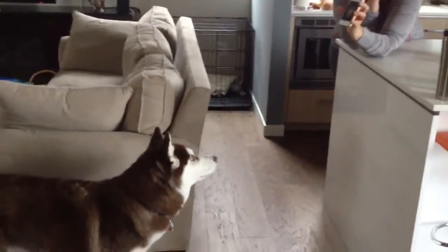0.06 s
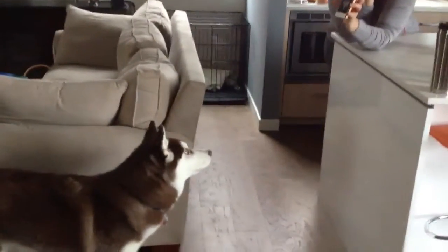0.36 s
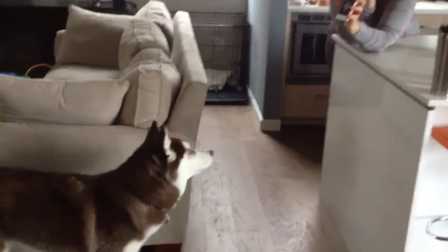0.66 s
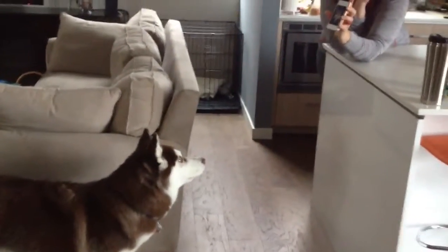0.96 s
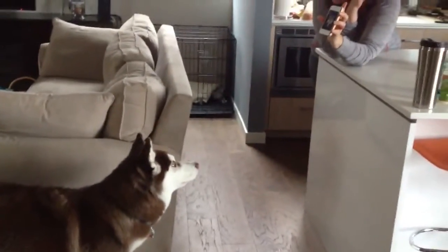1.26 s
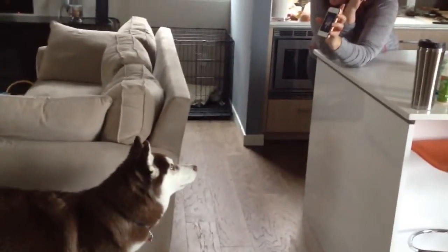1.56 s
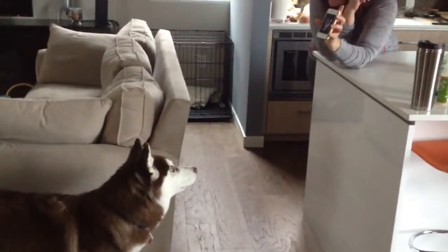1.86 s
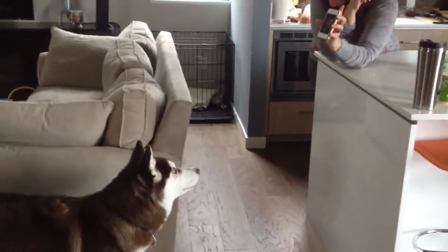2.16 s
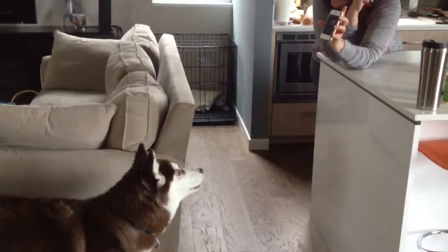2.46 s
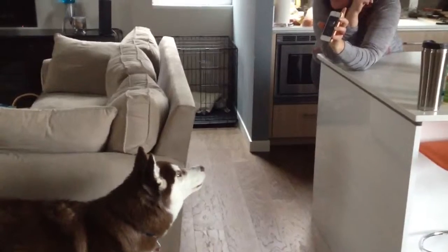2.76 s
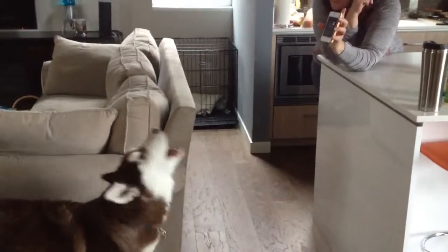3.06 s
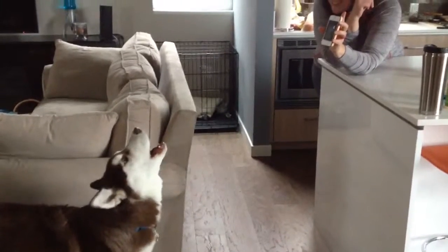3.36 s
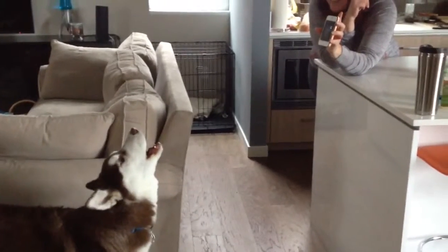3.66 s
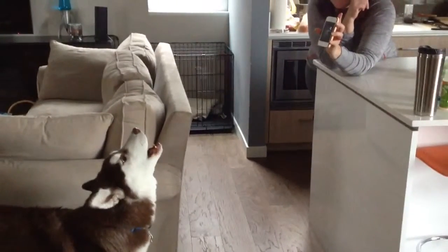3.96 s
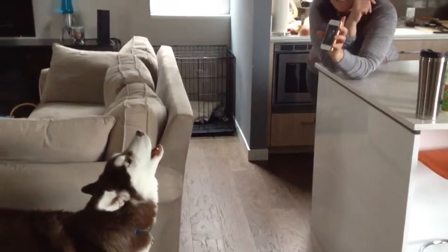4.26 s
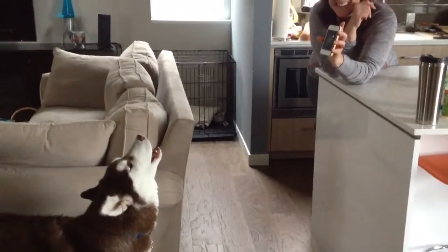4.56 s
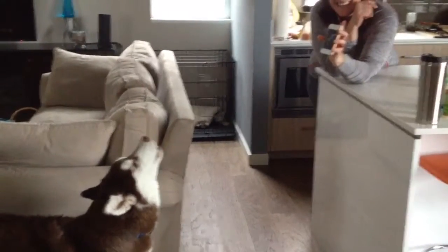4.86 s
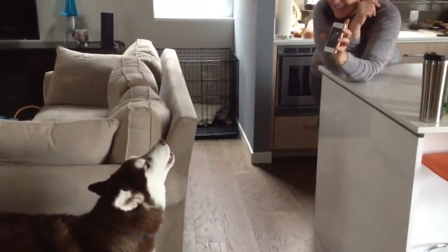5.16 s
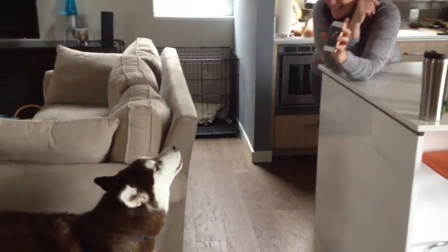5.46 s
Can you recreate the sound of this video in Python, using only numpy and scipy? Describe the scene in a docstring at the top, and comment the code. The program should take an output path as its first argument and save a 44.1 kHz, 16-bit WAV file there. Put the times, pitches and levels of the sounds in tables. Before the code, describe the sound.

A dog yaps faintly from a phone speaker, then a husky answers with a hoarse bark and one long, loud howl indoors.

```python
"""A husky answers a phone

In a hard-floored living room, a dog yaps and yowls faintly from a phone's small speaker.
A husky answers with a hoarse bark that opens into one long clean howl, breaks to a lower note,
swells and sags. Its vocal folds make a tone and puffs of air, which throat and mouth shape.
The room rings with both dogs; an appliance hums quietly."""
import sys
import numpy as np
from scipy import signal
from scipy.fft import rfft, irfft, next_fast_len
from scipy.io import wavfile
from scipy.ndimage import uniform_filter1d, minimum_filter1d, map_coordinates

SR = 44100
rng = np.random.default_rng(int(sys.argv[2]) if len(sys.argv) > 2 else 0)


def wav_out(sig):
    """Save sig, one row per channel (or a flat mono array), as 16-bit PCM at SR to the path in sys.argv[1]."""
    wavfile.write(sys.argv[1], SR, np.round(np.clip(np.atleast_2d(sig).T, -1, 1) * 32767).astype(np.int16))


N = 247386
START_S, OPEN_S = 2.872, 0.079  # the howl sets in; time its overtones take to arrive
CRACK_S = 3.905  # the voice breaks to the lower note

# the tune of the howl: (time [s], pitch [Hz])
HOWL_TUNE = [(2.93, 383.7), (2.985, 530.3), (3.08, 504.7), (3.15, 499.5), (3.38, 496.8), (3.5, 490.4),
             (3.85, 481), (3.905, 471), (3.925, 431.8), (4.06, 398.6), (4.2, 378.5), (4.44, 362),
             (5.06, 363.8), (5.16, 375), (5.36, 381), (5.5, 376.3), (5.56, 360.4), (5.61, 329)]
# how hard the husky pushes: (time [s], level [dB])
HOWL_EFFORT = [(2.87, -64), (2.9, -26.5), (2.95, -22), (2.985, -15.5), (3.17, -10), (3.42, -14),
               (3.6, -18.5), (3.73, -21.5), (3.87, -16), (4.13, -20.5), (4.36, -28.5), (4.62, -26.5),
               (5.2, -26), (5.36, -29.5), (5.52, -30), (5.61, -42.5)]
# how hoarse it is: (time [s], hoarseness [dB])
HOARSENESS = [(2.96, 2.5), (3.0, -4), (3.16, -24.5), (3.7, -19.5), (3.89, -16), (3.93, -8.5), (4.05, -18),
              (4.6, -15.5), (4.9, -19), (5.1, -25), (5.47, -26.5), (5.61, -8)]
def husky():
    """Vibrating vocal folds: a rough bark settles into a clean howl."""
    melody, effort_db, hoarse_db = curves(HOWL_TUNE) + curves(HOWL_EFFORT) + curves(HOARSENESS)
    drive = (np.arange(N) / SR > START_S) * echo_beating()
    # hoarse folds also keep their pitch less well
    pitch = melody * (1 + 0.0014 * wobble(34) + 0.0207 * amp(hoarse_db) * wobble(170))
    phase = cycle(pitch)
    *low_swells, nasal_swell = room_swells()
    tone, tone_level = chest(melody, phase, effort_db, low_swells)
    breath = rasp(phase, tone_level, hoarse_db)
    low = in_room(drive * tone, wet_db=-15)
    rough = in_room(drive * (bark(melody, phase) + breath), wet_db=-16)
    # the upper overtones get more room echo; the low harmonics stay drier and steadier
    high = in_room(drive * upper_voice(pitch, phase, hoarse_db, nasal_swell), wet_db=0)
    return low + rough + high


# how the throat boosts the third harmonic: (frequency [Hz], level [dB])
THROAT_COLOUR = [(1000, -10), (1085, -1), (1128, 5), (1200, 2.5), (1300, -4), (1465, -3.5), (1497, -2.5),
                 (1575, 11.5)]
# second and third harmonic: (level [dB], rise with effort [dB/dB], rise as the mouth opens [dB])
SECOND_HARMONIC = (-26.5, 0.035, 17.4)
THIRD_HARMONIC = (-33, 0.54, 2)
def chest(melody, phase, effort_db, swells):
    """The howl's core and its level: three harmonics, pure tones at 1, 2 and 3 times the pitch."""
    first, second, third = swells
    levels = [first * amp(effort_db),
              second * strength(SECOND_HARMONIC),
              third * strength(THIRD_HARMONIC) * band(THROAT_COLOUR, 3 * melody)]
    tone = sum(level * np.sin(k * phase + rng.uniform(0, 2 * np.pi)) for k, level in enumerate(levels, 1))
    return np.sqrt(2) * tone, np.linalg.norm(levels, axis=0)


# rough breath in the throat: (frequency [Hz], level [dB])
RASP_COLOUR = [(120, -33.5), (300, -22.5), (520, 4.5), (680, -4.5), (815, 2), (930, -3), (1250, -21),
               (1600, -3.5), (2000, -19), (2800, -31.5)]
def rasp(phase, tone_level, hoarse_db):
    """Air puffs through the folds, louder when the voice is strong or hoarse."""
    return tone_level * amp(hoarse_db - 7 + 2.4 * wobble(22.29)) * noise(RASP_COLOUR, puffs(phase))


# a grunt, then the throaty bark: (start [s], rise time [s], level [dB])
BARK_BURSTS = [(2.879, 0.024, -18.5), (2.914, 0.029, -7.5)]
# the noise of slapping folds: (frequency [Hz], level [dB])
SLAP_COLOUR = [(59, -83), (100, -44), (279, -16.5), (365, -11), (627, -5), (723, 4.5), (787, -4),
               (858, -13), (1160, -17), (1300, -34), (1520, -36), (2290, -24), (3000, -63), (3900, -76),
               (6600, -120)]
def bark(melody, phase):
    """The folds slap every other cycle; a second, unsteady vibration lingers until the voice breaks."""
    bursts = sum(amp(db) * envelope(start, rise, t60=0.15) for start, rise, db in BARK_BURSTS)
    slaps = bursts * noise(SLAP_COLOUR, puffs(phase / 2))
    rise_s, fade_s = 0.02, 0.4  # shape of the second vibration
    second_hz = np.maximum(738, 1.61 * melody) * (1 + 0.026 * wobble(200))
    second_gain = sum(amp(db - 8.5) * envelope(start, rise_s, fade_s) for start, _, db in BARK_BURSTS)
    second_gain += amp(-50.5) * envelope(START_S, rise_s, fade_s, hold=CRACK_S - START_S - rise_s)
    return slaps + np.sqrt(2) * second_gain * np.sin(cycle(second_hz))


# the husky's jaw: (time [s], opening [0 shut to 1 wide])
JAW = [(2.96, 1), (3.03, 0.22), (3.14, 0.05), (3.38, 0.6), (3.58, 0.72), (3.9, 0.8), (4.03, 0.38),
       (4.23, 0.81), (4.42, 0.67), (4.58, 0.41), (4.73, 0.42), (4.92, 0.22), (5.2, 0.52), (5.38, 0.65),
       (5.61, 0.38)]
# ringing of the throat, of the open mouth and of the highest overtones: (frequency [Hz], level [dB])
RING_COLOUR = [(1450, 9), (1620, 8.5), (1810, 3), (2000, 3.5), (2170, 1), (2280, 3.5), (2480, -0.5),
               (2640, 0.5), (2750, -14.5), (2950, -28.5), (3280, -3), (3500, -11), (3750, -24),
               (4100, -31.5), (4800, -38.5), (5400, -45)]
SIZZLE_COLOUR = [(3900, -18), (4500, -17), (5100, -16.5), (5450, -6.5), (5680, 3), (6100, -1), (6550, 10.5),
                 (7200, 0.5), (7900, 4.5), (8400, -23)]
SHEEN_COLOUR = [(8300, -10), (9100, -5.5), (9900, -11.5), (10900, 0.5), (11400, -16), (12300, -14.5),
                (13000, -10.5), (13900, -13), (14300, -24.5), (15200, -15)]
# the same three parts: (level [dB], rise with effort [dB/dB], rise as the mouth opens [dB])
RING_PART = (-35, 0.12, 5)
SIZZLE_PART = (-52.5, 0.51, 19.5)
SHEEN_PART = (-55, 0.46, 0.95)
def upper_voice(pitch, phase, hoarse_db, nasal_swell):
    """High overtones pass through muzzle and lips: a nasal ring, an airy sizzle and a thin sheen."""
    mouth, = curves(JAW)
    lips = 1 + 0.22 * (mouth - .64)  # parted lips favour higher overtones in the sizzle
    ring = overtones(pitch, phase, RING_COLOUR, range(4, 13))
    ring = strength(RING_PART) * roughened(ring, phase, RING_COLOUR, hoarse_db - 2)
    sizzle = overtones(pitch / lips, phase, SIZZLE_COLOUR, range(11, 25))
    sizzle = strength(SIZZLE_PART) * roughened(sizzle, phase, SIZZLE_COLOUR, hoarse_db + 12.5)
    sheen = overtones(pitch, phase, SHEEN_COLOUR, range(16, 42))
    sheen = strength(SHEEN_PART) * roughened(sheen, phase, SHEEN_COLOUR, hoarse_db + 8.5)
    return nasal_swell * ring + sizzle + sheen


def strength(part):
    """One part of the husky's voice grows louder with effort and as the mouth opens."""
    level_db, per_effort, opening_db = part
    easy_db = -21  # the effort of an easy howl
    effort_db, mouth = curves(HOWL_EFFORT) + curves(JAW)
    fade_in, = curves([(START_S, 0), (START_S + OPEN_S, 1)])
    return fade_in * amp(level_db + per_effort * (effort_db - easy_db) + opening_db * (mouth - .5))


# brief swells and dips in the howl:
# (time [s], half width [s], harmonic 1 [dB], harmonic 2 [dB], harmonic 3 [dB], nasal ring [dB])
HOWL_SWELLS = [(2.99, 0.044, 1, -7, 1.5, -0.5), (3.259, 0.037, -2, -1, 4, -6.5),
               (3.34, 0.038, 1.5, -2.5, 5.5, 2.5), (3.55, .06, 0.5, 2, -2.5, -1.5),
               (3.65, 0.028, -19.5, 0, 10, -3.5), (3.76, 0.046, 0, -0.5, 0, -5),
               (3.829, .02, 1.5, -23, -4, -4), (4.004, 0.017, -8, -2, -2, 2),
               (4.128, 0.073, -0.5, 2, -0.5, 8.5), (4.226, 0.014, -1, 6.5, -6, -5.5),
               (4.339, 0.0098, -1, -8, -12, 4.5), (4.6, .25, -1, -.5, -0.5, 1.5),
               (5.18, 0.058, 0.5, 0.5, 6.5, 1), (5.38, .1, 1, 4, -0.5, 1), (5.5, 0.02, 3, 0.5, 1, -3)]
def room_swells():
    """Harmonics swell and dip briefly as the pitch glides through the room's resonances."""
    t = np.arange(0, N, 64) / SR
    db = sum(np.outer(np.exp(-((t - time) / width) ** 2), dbs) for time, width, *dbs in HOWL_SWELLS)
    return curves(np.column_stack([t, amp(db)]))


def echo_beating():
    """After the break, the higher note's echo beats against the lower note; the throbs slow and fade."""
    fast_hz, slow_hz, depth, fade_s = 42.56, 20.65, 0.63, 0.25
    since = np.maximum(np.arange(N) / SR - CRACK_S, 0)
    fading = np.exp(-since / fade_s)
    rate = (since > 0) * (slow_hz + (fast_hz - slow_hz) * fading)
    return 1 - depth * fading * np.sin(cycle(rate) / 2) ** 2


# body, brightness and whine of the dog on the phone: (frequency [Hz], level [dB])
PHONE_BODY = [(300, -22.5), (480, -26), (570, -5), (690, 3.5), (900, 2.5), (1100, -7), (1500, -44)]
PHONE_BRIGHT = [(700, -46), (950, -23.5), (1200, 9.5), (1420, -9.5), (1800, 3.5), (2150, -13.5),
                (2450, -6.5), (2900, -16.5), (3400, -21.5), (4200, -18), (6000, -31), (9000, -36)]
PHONE_WHINE = [(2100, -21), (2350, 2), (2480, -1), (2700, -13.5), (2900, -4.5), (3150, -27), (3500, -17),
               (3900, -45.5)]
def phone():
    """Short barks trail into yowls or whines, from a tiny speaker across the room."""
    pitch, rough_db, (body_gain, bright_gain, whine_gain) = yapping()
    # in high yowls the overtones sink into the breath noise
    hollow_db = np.interp(pitch, [620, 700], [0, 9])
    pitch = pitch * (1 + 0.0203 * amp(rough_db) * wobble(90))
    phase = cycle(pitch)
    body = overtones(pitch, phase, PHONE_BODY, range(1, 3))
    body = roughened(body, phase, PHONE_BODY, rough_db - 4)
    bright = overtones(pitch, phase, PHONE_BRIGHT, range(2, 5))
    bright = roughened(bright, phase, PHONE_BRIGHT, rough_db + hollow_db + 4.5)
    whine = overtones(pitch, phase, PHONE_WHINE, range(3, 8))
    return in_room(body_gain * body + bright_gain * bright + whine_gain * whine, wet_db=-3.5)


# calls of the dog on the phone: (start [s], length [s], first pitch [Hz], last pitch [Hz],
# body [dB], brightness [dB], whine [dB], roughness [dB])
PHONE_CALLS = [(0, 0.16, 587, 588, -66, -70, -70, -3), (.195, 0.09, 596, 737, -51.5, -52.5, -81, -1),
               (.32, 0.19, 731, 741, -56.5, -70, -77, -8.5),
               (.435, 0.15, 734, 825.6, -61.5, -64.5, -68.5, -0.5),
               (.81, 0.11, 583, 671, -54.5, -54.5, -86, 3), (.975, .11, 590, 630, -62, -57, -84, 2),
               (1.1, 0.071, 662, 716, -53, -60, -90, -7),
               (1.215, 0.1047, 714.6, 695.8, -58.5, -66.5, -85, -11.5),
               (1.482, 0.098, 608.9, 697, -52, -55, -78, 4.5),
               (1.72, 0.069, 525, 555, -64.5, -61, -79, -7.5),
               (1.79, 0.095, 578.5, 609.7, -66, -56, -81, -3),
               (2.095, 0.059, 457, 467, -57.5, -59.5, -74, 0),
               (2.175, 0.077, 465.6, 470.4, -78, -61.5, -64, -3.5),
               (2.28, 0.12, 602, 588, -77, -62.5, -57, -5),
               (2.41, 0.15, 537, 477.8, -62.5, -61.5, -57, -2.5),
               (2.545, .12, 480, 515, -50, -53, -94, 8.5), (2.81, 0.069, 536, 570, -58.5, -54.5, -80, -4)]
def yapping():
    """Each call swells, slides in pitch, grows rougher and dies away."""
    rise_s, sag_db_per_s, fade_s, cleaner_db = 0.02, 31, 0.13, 9
    age = np.arange(SR // 2) / SR
    pitch = np.full(N, float(PHONE_CALLS[-1][3]))
    rough_db, gains = np.zeros(N), np.zeros((3, N))
    for start, length, first_hz, last_hz, *levels_db, noise_db in PHONE_CALLS:
        at = round(start * SR)
        span = slice(at, at + len(age))
        settling = 1 - np.tanh(age / (.42 * length))
        pitch[span] = last_hz + (first_hz - last_hz) * settling
        rough_db[span] = noise_db - cleaner_db * settling
        fade_db = -sag_db_per_s * age - 60 * np.maximum(age - length, 0) / fade_s
        gains[:, span] += np.outer(amp(levels_db), np.minimum(age / rise_s, 1) * amp(fade_db))
    return uniform_filter1d(pitch, size=441), uniform_filter1d(rough_db, size=441), gains


# how long the room rings: (frequency [Hz], time to fade by 60 dB [s])
ROOM_FADE = [(100, 0.076), (300, 0.52), (800, 0.75), (2500, 0.6), (7000, 0.15), (14000, 0.14)]
def in_room(x, wet_db):
    """Floor and walls add an echo; wet_db is its level against the direct sound."""
    hz, t, spectrum = signal.stft(rng.standard_normal(SR * 3 // 4), SR, nperseg=256)
    fading = amp(-60 * t / along(ROOM_FADE, hz)[:, None])
    tail = signal.istft(spectrum * fading, SR, nperseg=256)[1]
    tail = np.pad(tail / np.linalg.norm(tail), (SR // 250, 0))  # arrives 4 ms late
    return (x + amp(wet_db) * signal.fftconvolve(x, tail)[:N]) / np.hypot(1, amp(wet_db))


# the quiet room's air: (frequency [Hz], level [dB])
AIR_COLOUR = [(15, -70.5), (25, -31), (69, -19), (224, -1), (450, -7.5), (673, -5.5), (1030, -10),
              (1150, -4), (1460, -3.5), (1760, -15.5), (2070, -14), (2780, -16), (3180, -19.5),
              (10000, -28.5), (15000, -35.5)]
def room_tone():
    """Still air, the microphone's hiss and an appliance's wavering hum."""
    hum = amp(-74.5 + 2.7 * wobble(2.6)) * np.sin(cycle(221 + 3.1 * wobble(12)))
    air = amp(-66.5) * noise(AIR_COLOUR)
    hiss = amp(-82) * noise([(3000, 0), (10000, -13.5), (13000, 4), (15300, 1)])
    return air + hiss + hum


def overtones(pitch, phase, colour, orders):
    """Multiples of the pitch, made louder or softer by a colour, each wavering a little."""
    flutter_db, flutter_per_s = 2.38, 9
    step = 32  # samples between gain updates
    gains = band(colour, np.outer(orders, pitch[::step]))
    gains /= np.sqrt(np.sum(gains ** 2, axis=0) / 2)
    knots = np.arange(0, N, step) * flutter_per_s / SR
    flutter = [map_coordinates(rng.standard_normal(128), [knots], mode='mirror') for _ in orders]
    gains *= amp(flutter_db * np.array(flutter))
    return sum(np.repeat(gain, step)[:N] * np.sin(k * phase + rng.uniform(0, 2 * np.pi))
               for k, gain in zip(orders, gains))


def roughened(tone, phase, colour, rough_db):
    """Mix a tone with puffs of rushing air from the same throat."""
    return (tone + amp(rough_db) * noise(colour, puffs(phase))) / np.hypot(1, amp(rough_db))


def puffs(phase):
    """Air passes once in each cycle of the folds."""
    return 1 + np.cos(phase)


def cycle(pitch):
    """Phase: how far a vibration has turned, in radians."""
    return 2 * np.pi * np.cumsum(pitch) / SR


def noise(colour, gate=1):
    """Coloured noise of average power 1, let through in puffs by a gate."""
    x = filtered(gate * rng.standard_normal(N), lambda hz: band(colour, hz))
    return x / np.sqrt(np.mean(x ** 2) + 1e-20)


def band(colour, hz):
    """How much a colour (a table of levels by frequency) lets through; little beyond its ends."""
    inside = np.clip(hz, colour[0][0], colour[-1][0])
    octaves_outside = np.abs(np.log2((hz + 1) / inside))
    return amp(along(colour, hz) - 60 * octaves_outside)


def filtered(x, response):
    """Turn each frequency of x up or down by response(hz)."""
    size = next_fast_len(N + SR // 2)
    return irfft(rfft(x, size) * response(np.fft.rfftfreq(size, 1 / SR)), size)[:N]


def envelope(start, rise, t60, hold=0):
    """Loudness that rises, holds, then fades by 60 dB every t60 seconds."""
    t = np.arange(N) / SR - start
    return np.clip(t / rise, 0, 1) * amp(-60 * np.maximum(t - rise - hold, 0) / t60)


def wobble(rate):
    """A smooth curve through rate random points a second."""
    return map_coordinates(rng.standard_normal(int(N * rate / SR) + 4), [np.arange(N) * rate / SR])


def curves(rows):
    """One value per sample for each column after the time."""
    times, *columns = np.transpose(rows)
    return [np.interp(np.arange(N) / SR, times, column) for column in columns]


def along(points, hz):
    """Read between (frequency, value) points, with octaves evenly spaced."""
    frequencies, values = np.transpose(points)
    return np.interp(np.log(hz + 1), np.log(frequencies + 1), values)


def amp(db):
    """Decibels to gain."""
    return 10 ** (np.asarray(db) / 20)


def scene():
    """Both dogs in the quiet room."""
    return (husky() + phone() + room_tone())[None]


def record(dry):
    """A limiter holds down the bark's peaks, and the highest treble is cut off."""
    ceiling, top_hz = .68, 15300
    needed = np.minimum(1, ceiling / (np.abs(dry[0]) + 1e-9))
    gain = uniform_filter1d(minimum_filter1d(needed, size=101), size=101)
    return filtered(gain * dry[0], lambda hz: hz < top_hz)[None]


dry = scene()
out = record(dry)
wav_out(out)
```